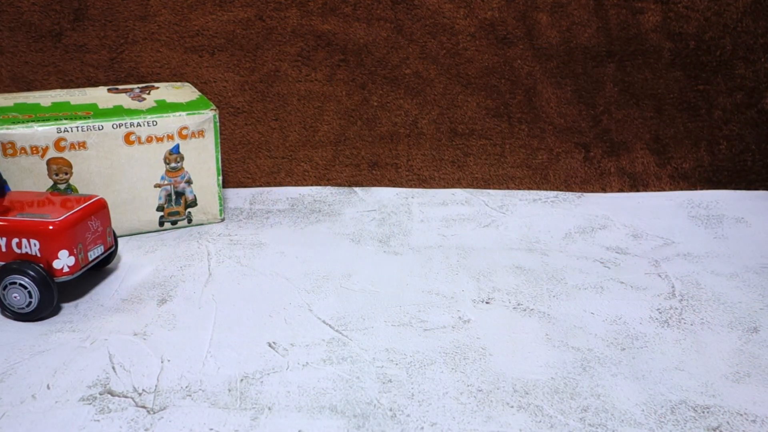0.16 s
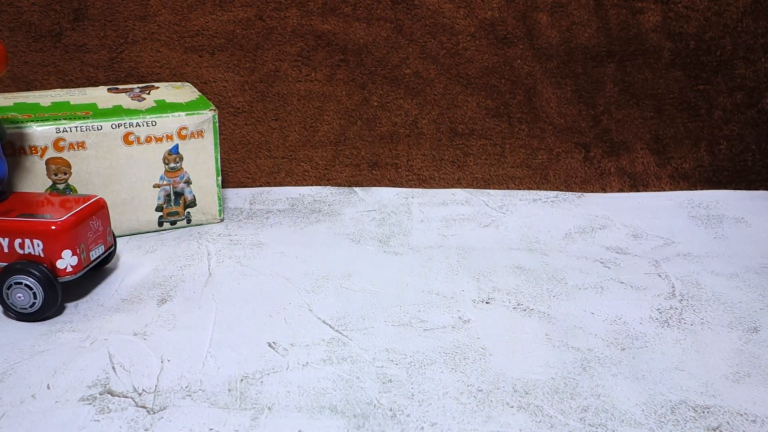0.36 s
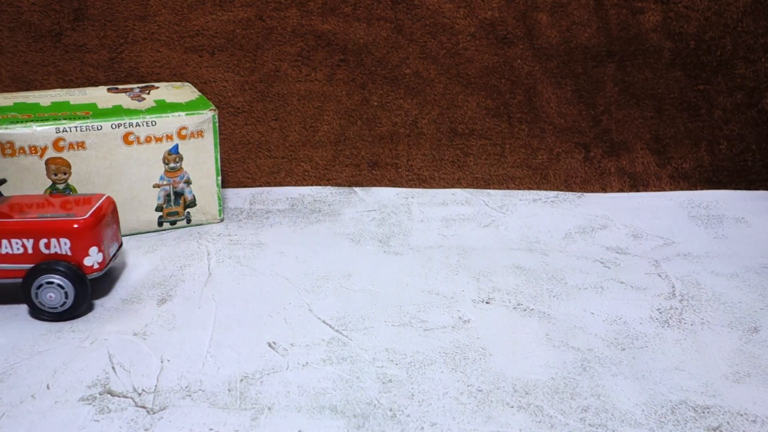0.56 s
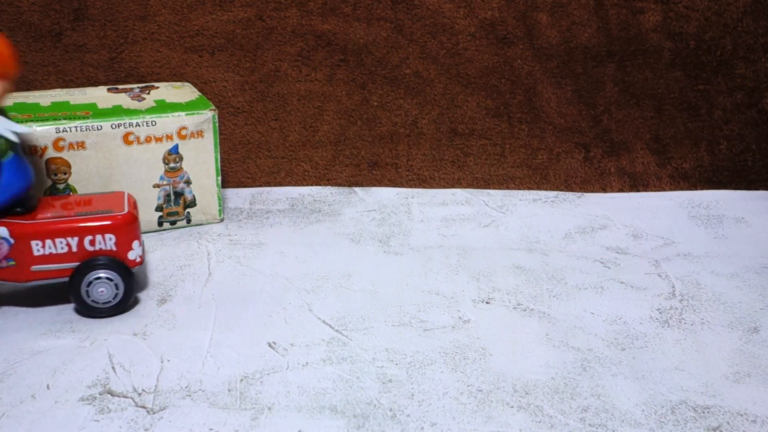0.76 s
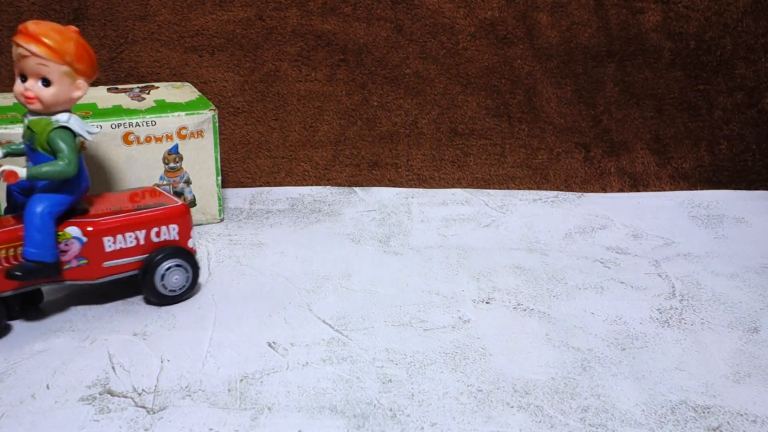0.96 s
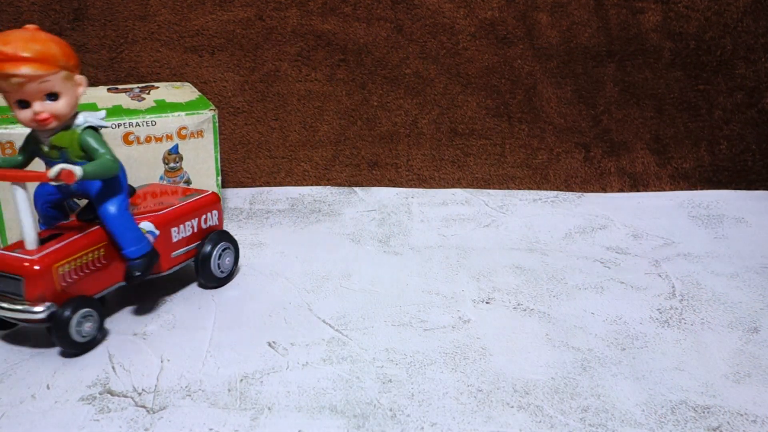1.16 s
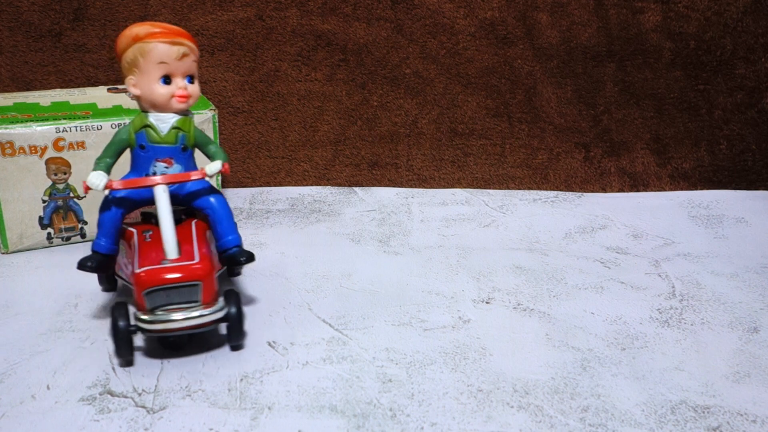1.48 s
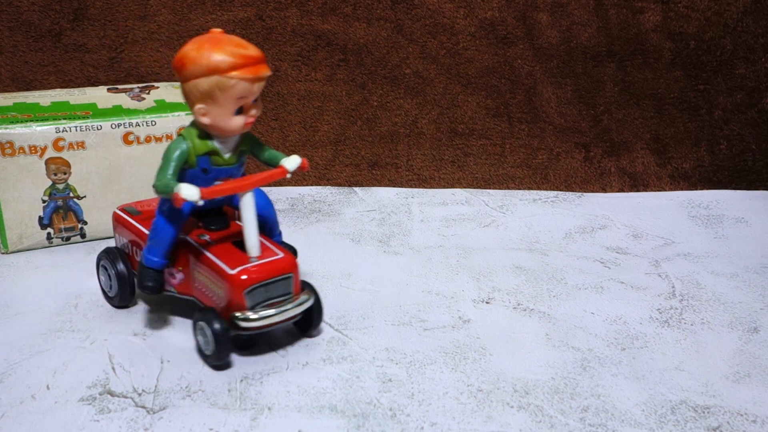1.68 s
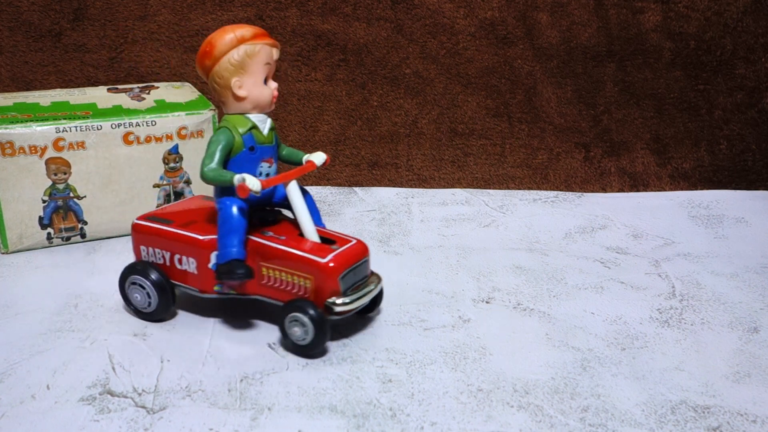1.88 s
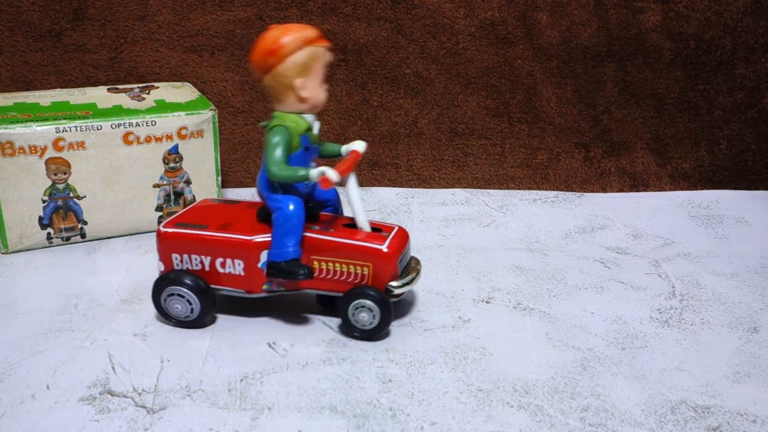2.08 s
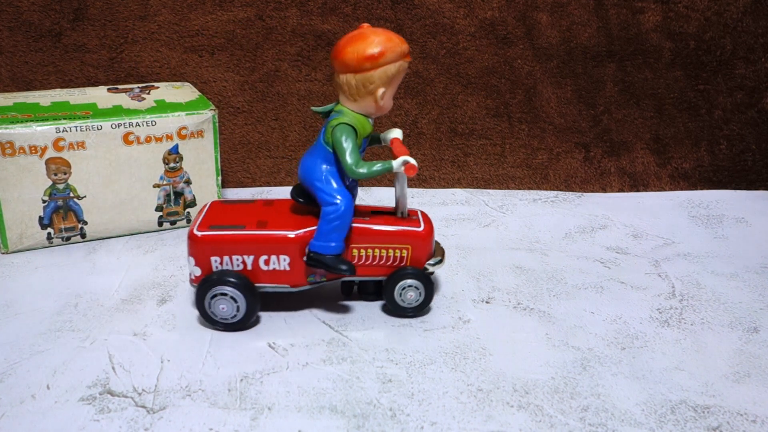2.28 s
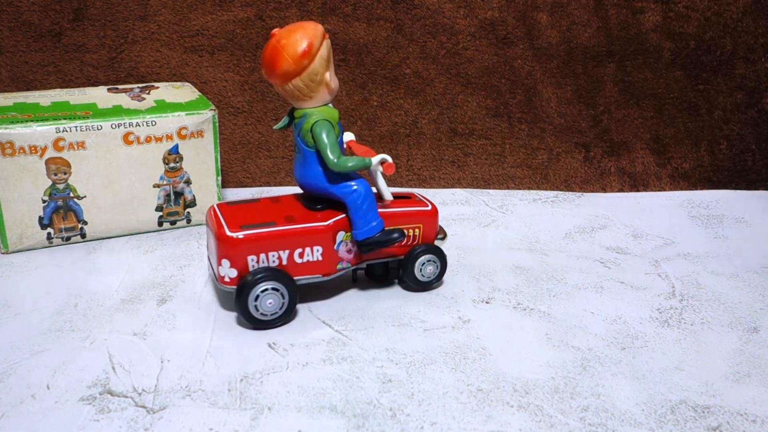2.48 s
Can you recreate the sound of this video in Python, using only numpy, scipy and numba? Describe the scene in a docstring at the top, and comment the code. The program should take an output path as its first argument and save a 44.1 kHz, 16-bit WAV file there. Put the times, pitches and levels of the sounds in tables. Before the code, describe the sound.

Continuous harsh, metallic gear whirr from a small tin toy car, surging unevenly, with steady short high bell clinks over it from start to end; close and dry on a table, leaning to the right.

```python
"""Tin toy car with a bell

A tin toy car drives in a curve on a table, close by and louder in the right microphone.
Loose gear teeth knock at random and ring the tin resonances; their level surges around each cam stroke.
The cam flicks a clapper against a small, half-damped bell almost four times a second: noise bursts
and three decaying sine modes. The table top adds a faint rumble of filtered noise."""
import sys
import numpy as np
from scipy import signal
from scipy.fft import rfft, irfft
from scipy.io import wavfile
from numba import njit

SR = 44100
rng = np.random.default_rng(int(sys.argv[2]) if len(sys.argv) > 2 else 0)


def transcribe(u):
    """Save the signal u as a 16-bit wav file named by the first command-line argument.

    u: samples, shape (n,) or (channels, n), limited to [-1, 1]; the rate is SR.
    q: integer samples, one column per channel.
    """
    v = np.clip(np.atleast_2d(u).T, -1, 1)
    q = np.round(v * 32767).astype(np.int16)
    wavfile.write(sys.argv[1], SR, q)


N = 116865  # samples


def undb(db):
    """Decibels to gain."""
    return 10 ** (np.asarray(db) / 20)


def unit(x):
    """Scale to rms 1."""
    return x / np.sqrt(np.mean(x ** 2))


def walk(hz):
    """Smooth random motion of rms 1, mostly slower than hz."""
    f = np.arange(1, 4 * hz * N / SR) * SR / N
    bins = rng.standard_normal((len(f), 2)) @ np.array([1, 1j])
    bins = bins / (1 + (f / hz) ** 4)
    slow = irfft(np.append(0, bins), 8192)
    places = np.linspace(0, len(slow) - 1, N)
    return unit(np.interp(places, np.arange(len(slow)), slow))


def pan(db):
    """Left and right gains of constant power for a right-minus-left difference in dB."""
    g = undb(np.array([-db, db]).reshape(2, -1) / 2)
    return g / np.sqrt(np.mean(g ** 2, axis=0))


def colour(x, points):
    """Causal minimum-phase filter through (Hz, dB) points that keeps the power of white noise."""
    hz, db = np.array(points).T
    f = np.fft.rfftfreq(N, 1 / SR)
    gain = unit(undb(np.interp(np.log(f + 1), np.log(hz), db)))
    # folding the cepstrum forward in time makes the filter causal
    cepstrum = irfft(np.log(gain), N)
    cepstrum[1:N // 2] *= 2
    cepstrum[N // 2:] = 0
    impulse = irfft(np.exp(rfft(cepstrum)), N)[None, :SR // 20]
    return signal.fftconvolve(x, impulse, axes=1)[:, :N]


TIN_T60_S, TURNING_HZ = .06, 3


def reflect(x, share, count=4):
    """Direct sound plus dense reflections of sheet metal and near surfaces, which change as the car turns."""
    age = np.arange(SR // 4) / SR
    tails = rng.standard_normal((count, len(age))) * np.exp(-np.log(1000) * age / TIN_T60_S)
    tails /= np.linalg.norm(tails, axis=1, keepdims=True)
    blend = np.array([walk(TURNING_HZ) for tail in tails])
    echoes = irfft(rfft(x) * rfft(tails, N), N)
    wet = np.sum(blend * echoes, axis=0) / np.linalg.norm(blend, axis=0)
    return np.sqrt(1 - share) * x + np.sqrt(share) * wet


TOOTH_HITS_PER_S, TOOTH_SCATTER_DB = 3000, 1.5
SHAFT_HZ, SHAFT_DEPTH = 34.9, 0.055
SHAFT_WANDER, SHAFT_WANDER_HZ = 0.049, 4  # share of the shaft rate
FLUTTER_DB, FLUTTER_HZ = 1.3, 18


def teeth():
    """Dense, uneven knocks of loose teeth, a little stronger once per shaft turn."""
    hits = rng.random(N) < TOOTH_HITS_PER_S / SR
    size = undb(TOOTH_SCATTER_DB * rng.standard_normal(N))
    sign = np.sign(rng.standard_normal(N))
    turns = np.cumsum(SHAFT_HZ * (1 + SHAFT_WANDER * walk(SHAFT_WANDER_HZ))) / SR
    swell = 1 + SHAFT_DEPTH * np.sin(2 * np.pi * turns)
    flutter = undb(FLUTTER_DB * walk(FLUTTER_HZ))
    return unit(hits * size * sign * swell * flutter)


def spread(x, amount):
    """Direct knocks reach both microphones alike; scattered ones reach them in opposition."""
    return (x + amount * teeth() * np.array([[1], [-1]])) / np.hypot(1, amount)


@njit
def band(x, hz, width):
    """State-variable band-pass of peak gain 1 whose centre moves."""
    y, b, l = np.empty(len(x)), 0., 0.
    for i in range(len(x)):
        g, k = np.tan(np.pi * hz[i] / SR), width / hz[i]
        v = (b + g * (x[i] - l)) / (1 + g * (g + k))
        b, l, y[i] = 2 * v - b, l + 2 * g * v, k * v
    return y


BODY_SPREAD = 0.19
MODE_WANDER_DB, MODE_WANDER_HZ = 2.2, 9  # depth reached from 2000 Hz up, less below
FLEX_WIDTHS, FLEX_RATE_HZ = .35, 9  # pitch bend in resonance widths


def resonate(modes):
    """Tooth knocks ring a set of resonances; each swells, fades and bends in pitch as the tin flexes."""
    shake, out = spread(teeth(), BODY_SPREAD), 0
    for k, (hz, width, db, side_db) in enumerate(modes):
        wander_db = MODE_WANDER_DB * min(hz / 2000, 1) * walk(MODE_WANDER_HZ)
        centre = hz + FLEX_WIDTHS * width * walk(FLEX_RATE_HZ)
        rung = np.array([band(side, centre, float(width)) for side in shake])
        out = out + (-1) ** k * undb(db + wander_db) * pan(side_db) * rung
    high_pass = signal.butter(10, 370, "high", fs=SR, output="sos")
    return unit(signal.sosfilt(high_pass, out))


# Tone of the table top under the wheels. Each row: frequency in Hz, relative level in dB.
TABLE_TONE = [(20, -14), (50, -9), (90, -0.5), (130, 4), (200, 1.5), (320, 1), (500, 0.5), (2000, -47)]
RUMBLE_DB = -60.5


def table():
    """Faint rumble of the wheels in the table top: low-pitched noise, nearly alike in both microphones."""
    mid, side = rng.standard_normal((2, N))
    noise = mid + 0.19 * side * np.array([[1], [-1]])
    return undb(RUMBLE_DB) * unit(colour(noise, TABLE_TONE))


# Resonances of the chassis on its wheels.
# Each row: frequency in Hz, width in Hz, relative level in dB, right minus left in dB.
CHASSIS_MODES = [(381.4, 27, -4.5, -0.5), (459, 41, -2, 0), (517, 18.5, -6.5, -11)]
CHASSIS_DB, CHASSIS_DB_PER_S = -49.5, -3  # level at the start, and its slope
CHASSIS_WOBBLE_DB, WOBBLE_HZ = 3.5, 13


def chassis(t):
    """Tooth knocks ring the chassis, wobbling in level and slowly fading."""
    level_db = CHASSIS_DB + CHASSIS_DB_PER_S * t + CHASSIS_WOBBLE_DB * walk(WOBBLE_HZ)
    return undb(level_db) * resonate(CHASSIS_MODES)


# Short buzzes of loose panels.
# Each row: middle in seconds, half length in seconds (to 1/e), pitch at the middle in Hz, level in dB.
PANEL_BUZZES = [(.33, .02, 1840, -35), (1.305, .045, 3755, -36), (1.55, .025, 4310, -37),
                (1.6, .025, 1365, -36), (1.725, .022, 1260, -37), (1.81, .018, 1370, -36),
                (1.815, .02, 1700, -35), (2.115, .024, 1425, -35), (2.12, .035, 4250, -38),
                (2.137, .02, 1710, -33), (2.355, .02, 1660, -36)]
BUZZ_SAG_HZ_PER_S, BUZZ_PAN_DB, BUZZ_ROUGH = 900, 9, 0.37


def buzzes(t):
    """Loose panels catch the vibration for a moment and sound a rough, sinking note."""
    out = 0
    for at, length, hz, db in PANEL_BUZZES:
        pitch = hz - BUZZ_SAG_HZ_PER_S * (t - at)
        rough = 1 + BUZZ_ROUGH * (walk(72) + 1j * walk(60))
        note = np.imag(rough * np.exp(2j * np.pi * np.cumsum(pitch) / SR))
        out = out + undb(db) * np.exp(-((t - at) / length) ** 2) * note
    return np.sqrt(2) * out * pan(BUZZ_PAN_DB)


# Resonances of the hollow tin body.
# Each row: frequency in Hz, width in Hz, relative level in dB, right minus left in dB.
HOLLOW_MODES = [(600, 50, -11.5, 1), (687.5, 35, -1.5, 2.5), (737.6, 30.7, 2.5, 1), (774.4, 26, 1, 0),
                (820.5, 66, -4.5, 14)]
# Resonances of a side wall. Each row: frequency in Hz, width in Hz, relative level in dB, right minus left in dB.
WALL_MODES = [(890, 34, -14.5, 10), (954, 16, -4, -0.5)]
WALL_DB, WALL_DB_PER_S = -11.5, 3.5  # relative to the hollow body, at the start, and its slope


def hollow_body(t):
    """Tooth knocks ring the hollow tin and a side wall, louder as it turns towards the microphones."""
    return resonate(HOLLOW_MODES) + undb(WALL_DB + WALL_DB_PER_S * t) * resonate(WALL_MODES)


# Resonances of the flat tin panels.
# Each row: frequency in Hz, width in Hz, relative level in dB, right minus left in dB.
PANEL_MODES = [(1163, 16, 2.5, 16), (1249, 22, 6, -2), (1343, 26, 6, 5.5), (1428, 25, 1.5, 12),
               (1657, 54, 3.5, 3.5), (1836, 29.5, 4.5, 20.5), (2019, 79, -3, -1)]


def panels():
    """Tooth knocks ring the flat panels of the body."""
    return resonate(PANEL_MODES)


RATTLES_PER_S, RATTLE_DECAY_S, RATTLE_DB, RATTLE_SCATTER_DB = 60, .003, -3.5, 2


def backlash():
    """Gain of the chatter: slack gears slap together in short, uneven rattles."""
    hits = rng.random(N) < RATTLES_PER_S / SR
    slaps = hits * undb(RATTLE_DB + RATTLE_SCATTER_DB * rng.standard_normal(N))
    # the decay is of power, added to a steady 1
    power = signal.lfilter([1], [1, -np.exp(-1 / (RATTLE_DECAY_S * SR))], slaps ** 2)
    return unit(np.sqrt(1 + power))


# Tone of the gear chatter. Each row: frequency in Hz, relative level per Hz in dB.
GEAR_TONE = [(330, -40.5), (420, -19.5), (1100, -7), (1800, -6), (2450, -6), (3300, -1.5), (3900, -3.5),
             (4600, -2), (5000, -4.5), (6500, -1.5), (7300, -1.5), (8700, -5.5), (11500, -6.5),
             (13000, -7.5), (15700, -7)]
# Resonances of the gearbox plates.
# Each row: frequency in Hz, width in Hz, relative level in dB, right minus left in dB.
PLATE_MODES = [(3272, 70, 2, 26), (3455, 120, -6.5, 18), (3703, 68, 0.5, 10), (3956, 65, 2.5, 26),
               (4275, 34, 3, 16), (4905, 46, 3.5, 19), (5027, 70, 2, 9), (5427, 107, 2.5, 23),
               (6010, 38, 3.5, 8)]
PLATE_DB = -7.5  # relative to the chatter
TIN_SHARE, GEAR_SPREAD = .2, 0.61


def gearbox(side_db):
    """Coloured tooth knocks with reflections, plus the ringing plates, all rattling with the backlash."""
    knocks = spread(reflect(teeth(), TIN_SHARE), GEAR_SPREAD)
    chatter = unit(colour(knocks, GEAR_TONE))
    return backlash() * (chatter * pan(side_db) + undb(PLATE_DB) * resonate(PLATE_MODES))


# The car on its way past the microphones. Each row: time in seconds, levels of hollow body, panels and
# gears in dB before the load, right minus left of the gear chatter in dB.
CAR_PATH = [(0, -37.5, -40.5, -28.5, 6.5), (.4, -37, -36, -30, 5), (.8, -40, -40.5, -28.5, 5.5),
            (1.15, -38, -39.5, -30.5, 6), (1.45, -41, -37.5, -29.5, 5.5), (1.75, -39, -37, -28, 6.5),
            (2.05, -36.5, -36, -28, 6), (2.3, -36, -40.5, -28.5, 7.5), (2.65, -40, -36, -28.5, 7)]
# The gears take up load between strikes. Each row: middle in seconds, half length in seconds (to 1/e),
# rise of hollow body, panels and gears in dB.
LOAD_SURGES = [(0.106, 0.012, 5, 7, 3), (0.204, 0.028, 6.5, 1, 2), (0.523, 0.03, -1.5, 4, 3.5),
               (0.751, 0.022, 7, 2, 2), (0.824, 0.045, 2, 8, 0.5), (1.069, 0.024, 1.5, 6.5, 3.5),
               (1.289, 0.033, 2, -0.5, 4.5), (1.368, 0.0099, 10, -5, 5.5), (1.589, 0.046, 0, 3.5, 4.5),
               (1.698, 0.018, 1.5, 6.5, 1.5), (1.81, 0.028, 4.5, 4, 3), (2.12, 0.027, 4.5, -2, 4),
               (2.341, 0.032, 2.5, 1, 3.5)]
LIFT_LAG_S, LIFT_S = 0.017, 0.067  # load change after each strike: lag and half length
LIFT_HOLLOW_DB, LIFT_PANEL_DB, LIFT_GEAR_DB = 0.5, -1.5, 1.27


def drive(t):
    """Gear teeth chatter and shake gearbox, chassis and tin body; load changes their levels."""
    path = np.array(CAR_PATH).T
    *levels, side_db = (np.interp(t, path[0], column) for column in path[1:])
    lifts = [(strike[0] + LIFT_LAG_S, LIFT_S, LIFT_HOLLOW_DB, LIFT_PANEL_DB, LIFT_GEAR_DB)
             for strike in CLAPPER_STRIKES]
    load_db = 0
    for at, length, *rises in LOAD_SURGES + lifts:
        load_db = load_db + np.outer(rises, np.exp(-((t - at) / length) ** 2))
    hollow, panel, gear = undb(np.array(levels) + load_db)
    body = hollow * hollow_body(t) + panel * panels()
    return chassis(t) + buzzes(t) + body + gear * gearbox(side_db)


# Low bell note that the gears keep singing. Each row: time in seconds, level in dB.
SINGING_PATH = [(0, -49), (.3, -43), (.6, -44), (.8, -47), (1.0, -46), (1.15, -39.5), (1.42, -40),
                (1.7, -43.5), (2.0, -38), (2.15, -38.5), (2.3, -58), (2.65, -44)]
# Its resonance. Each row: frequency in Hz, width in Hz, relative level in dB, right minus left in dB.
SINGING_RESONANCE = [(2738, 36, 0, 11)]


def singing(t):
    """Tooth knocks keep the bell's lowest mode singing."""
    return undb(np.interp(t, *np.array(SINGING_PATH).T)) * resonate(SINGING_RESONANCE)


# Resonances of the bell's bracket.
# Each row: frequency in Hz, width in Hz, relative level in dB, right minus left in dB.
BRACKET_MODES = [(1886, 41, -1.5, 9), (2715, 49, -4.5, 12), (3000, 340, -3, 18), (3680, 200, -2, 12)]
BRACKET_DB, BRACKET_DECAY_S = -7, 0.024  # relative to the clack column


def bracket(t):
    """The bracket knocks with each touch of the clapper and dies away."""
    knock = 0
    for at, clack_db, *_ in CLAPPER_STRIKES + CLAPPER_REBOUNDS:
        age = np.maximum(t - at, 0)
        knock = knock + (t >= at) * undb(clack_db + BRACKET_DB) * np.exp(-age / BRACKET_DECAY_S)
    return knock * resonate(BRACKET_MODES)


# Tone of the clack. Each row: frequency in Hz, relative level per Hz in dB.
CLACK_TONE = [(150, -55), (500, -8.5), (1300, -8.5), (1850, -0.5), (2300, -25), (3200, -2), (5500, -18.5),
              (7400, 8), (9000, -4.5), (11500, -9), (12600, 12), (13400, 10.5), (14000, -6), (16000, 2)]
CLACK_DB, CLACK_PAN_DB = 4.5, 6.5  # added to both the clack and snap columns; right minus left
SNAP_DECAY_S, CLACK_DECAY_S, CLACK_TAIL_S = .0018, 0.022, 0.072
CLACK_TAIL_DB = -9  # relative to the clack


def clapper(t):
    """The clapper snaps and chatters: tooth-like knocks in a burst of three decays."""
    burst = 0
    for at, clack_db, *_, snap_db in CLAPPER_STRIKES + CLAPPER_REBOUNDS:
        age = np.maximum(t - at, 0)
        stages = ((snap_db, SNAP_DECAY_S), (clack_db, CLACK_DECAY_S),
                  (clack_db + CLACK_TAIL_DB, CLACK_TAIL_S))
        burst = burst + (t >= at) * sum(undb(db) * np.exp(-age / decay) for db, decay in stages)
    knocks = spread(reflect(teeth(), 1 / 2), GEAR_SPREAD)
    return undb(CLACK_DB) * colour(knocks * burst, CLACK_TONE) * pan(CLACK_PAN_DB)


# Clapper strikes. Each row: start in seconds, clack level in dB before CLACK_DB, top and middle bell mode
# levels in dB, free ringing in seconds, right minus left of the ring in dB, snap level in dB before CLACK_DB.
CLAPPER_STRIKES = [(0.047, -32, -11.5, -27, 0.008, 6, -34), (0.3172, -22, -21, -30, 0.025, 13, -23),
                   (.589, -31.5, -11, -23, .028, 8, -24), (0.8592, -26.5, -10.5, -27.5, 0.021, 5, -29),
                   (1.1277, -23.5, -20.5, -25, .025, 6, -19.5), (1.39, -24, -24, -16.5, 0.04, 4.5, -20),
                   (1.6612, -32, -10.5, -21, 0.026, 4.5, -26), (1.9218, -22.5, -20, -29, 0.025, 0, -19),
                   (2.1918, -25.5, -13, -26, .046, 14, -27), (2.4572, -22.5, -23, -25, 0.03, 17, -21.5)]
# The clapper rebounds and touches the bell again. Each row: the same columns and units as the strikes.
CLAPPER_REBOUNDS = [(0.076, -46, -22, -39, 0.04, 5.4, -40), (0.348, -48, -27, -33, 0.014, 6, -38)]
# Pitches of the bell's modes in Hz, lowest first.
BELL_MODES_HZ = [2725, 7060, 12562]
# Decay of each bell mode. Each row: time to fall 60 dB while free, and once damped, in seconds.
BELL_DECAYS = [(.25, 0.23), (.25, 0.3), (1, 0.14)]
BELL_LOW_DB, BELL_RISE_S = -8, 0.0012  # lowest mode relative to the clack column
SHIMMER_HZ, BELL_SHIMMER, DAMPED_SHIMMER = 70, .25, .7  # rate; share of power while free, once damped


def bell_tone(t):
    """Three modes ring freely for a moment, then flutter away under the damper."""
    shimmer = np.array([[walk(SHIMMER_HZ) + 1j * walk(SHIMMER_HZ) for side in "LR"]
                        for hz in BELL_MODES_HZ]) / np.sqrt(2)
    rings = 0
    for at, clack_db, top_db, middle_db, free_s, side_db, _ in CLAPPER_STRIKES + CLAPPER_REBOUNDS:
        age = np.maximum(t - at, 0)
        free_age, damped_age = np.minimum(age, free_s), np.maximum(age - free_s, 0)
        levels_db = (clack_db + BELL_LOW_DB, middle_db, top_db)
        modes = np.array([undb(db) * np.exp(-np.log(1000) * (free_age / free + damped_age / damped))
                          for db, (free, damped) in zip(levels_db, BELL_DECAYS)])
        rise = 1 - np.exp(-age / BELL_RISE_S)
        share = np.interp(age - free_s, [0, .02], [BELL_SHIMMER, DAMPED_SHIMMER])
        flutter = np.sqrt(1 - share) + np.sqrt(share) * shimmer
        rings = rings + (modes * rise)[:, None] * pan(side_db) * flutter
    return sum(np.imag(ring * np.exp(2j * np.pi * hz * t)) for ring, hz in zip(rings, BELL_MODES_HZ))


def bell(t):
    """The struck bell, its singing low mode, the knocking bracket and the clapper."""
    return singing(t) + bracket(t) + clapper(t) + bell_tone(t)


# Phase lead of the left microphone. Each row: frequency in Hz, lead in radians.
LEFT_LEAD = [(0, 0), (950, 0.55), (3800, 0.85), (7700, 1.4), (10000, 1.43), (15500, 2.5)]


def scene():
    """Table, drive and bell together; the sound reaches the right microphone slightly later."""
    t = np.arange(N) / SR
    left, right = table() + drive(t) + bell(t)
    hz, lead = np.array(LEFT_LEAD).T
    late = np.exp(-1j * np.interp(np.fft.rfftfreq(N, 1 / SR), hz, lead))
    return np.array([left, irfft(rfft(right) * late, N)])


CEILING, TOP_HZ = .8, 15700  # full scale is 1


def record(dry):
    """The recorder rounds the loudest peaks and cuts the top with a steep low-pass."""
    rounded = dry / (1 + (dry * dry / CEILING ** 2) ** 2) ** .25
    low_pass = signal.ellip(10, .2, 80, TOP_HZ, fs=SR, output="sos")
    return signal.sosfilt(low_pass, rounded)


dry = scene()
out = record(dry)
transcribe(out)
```